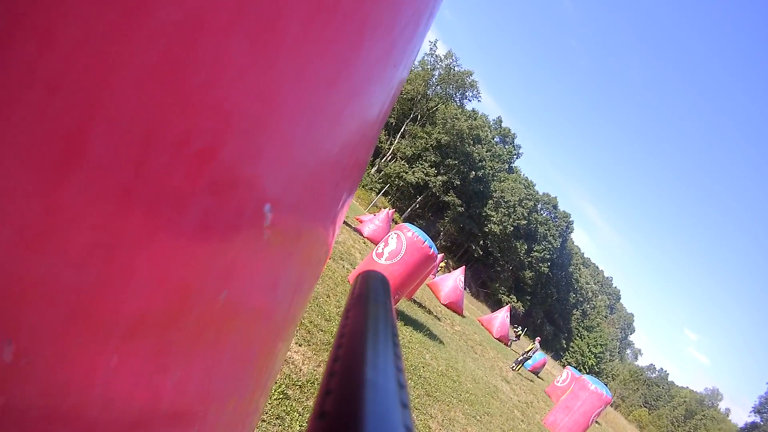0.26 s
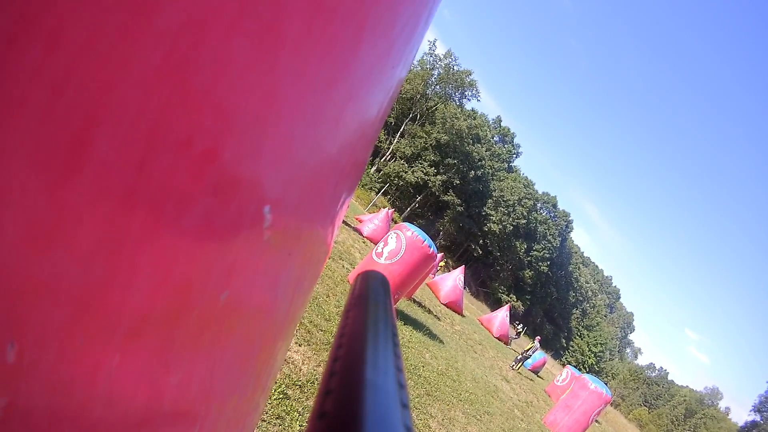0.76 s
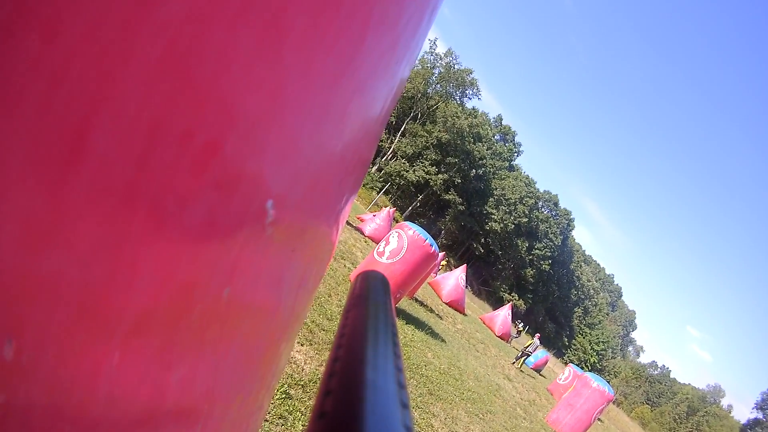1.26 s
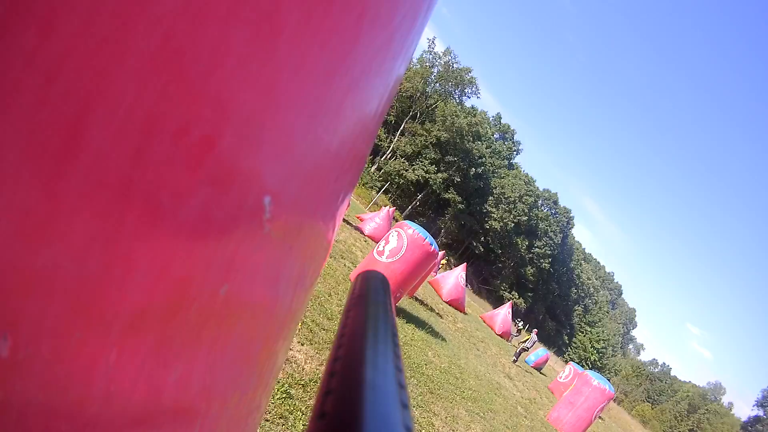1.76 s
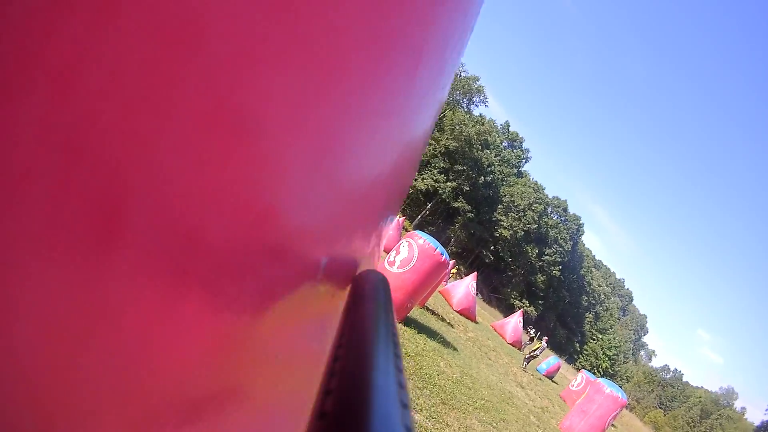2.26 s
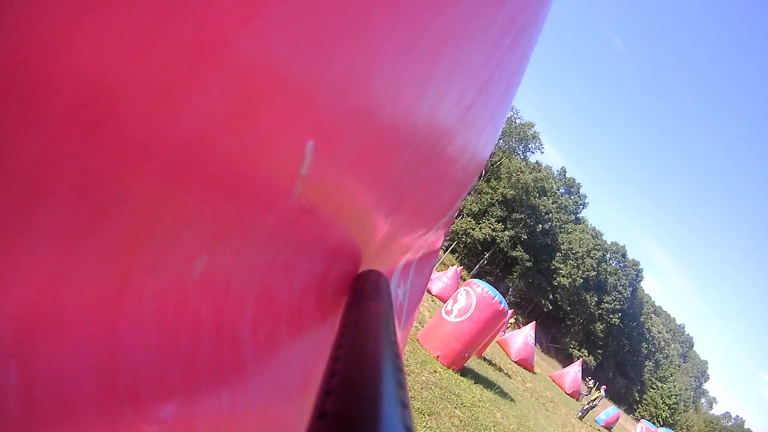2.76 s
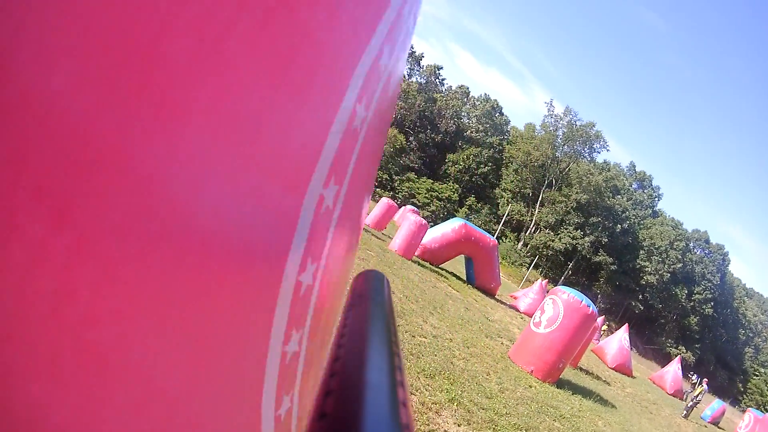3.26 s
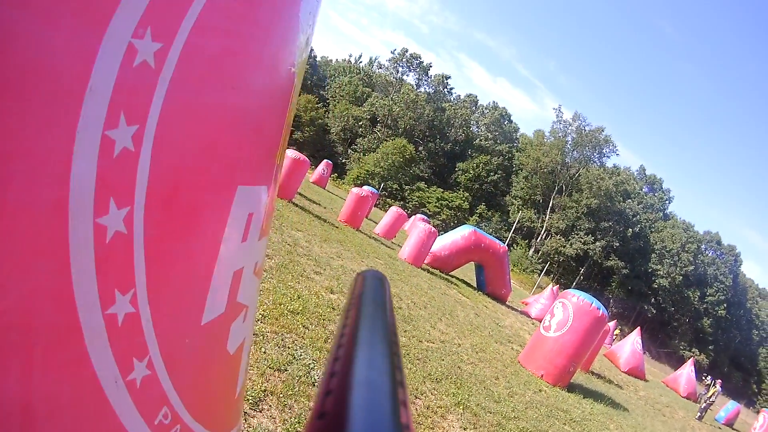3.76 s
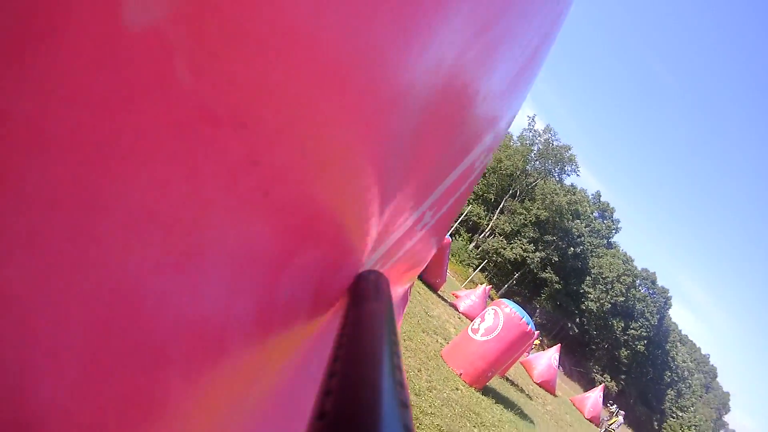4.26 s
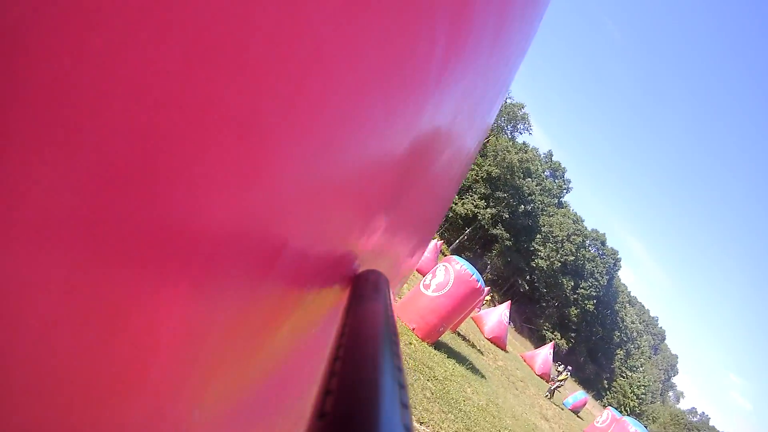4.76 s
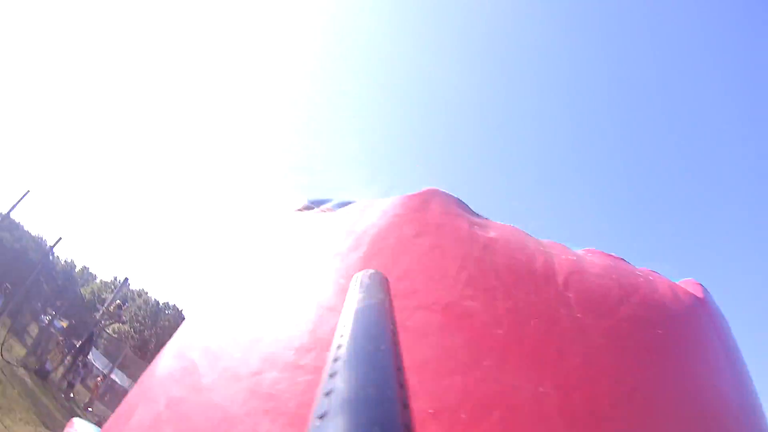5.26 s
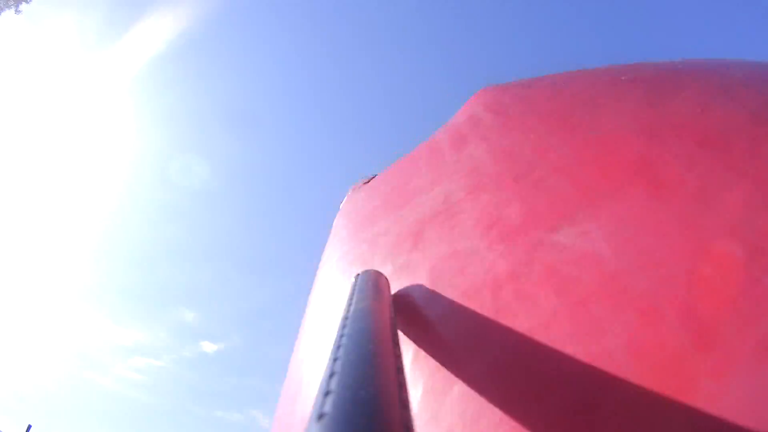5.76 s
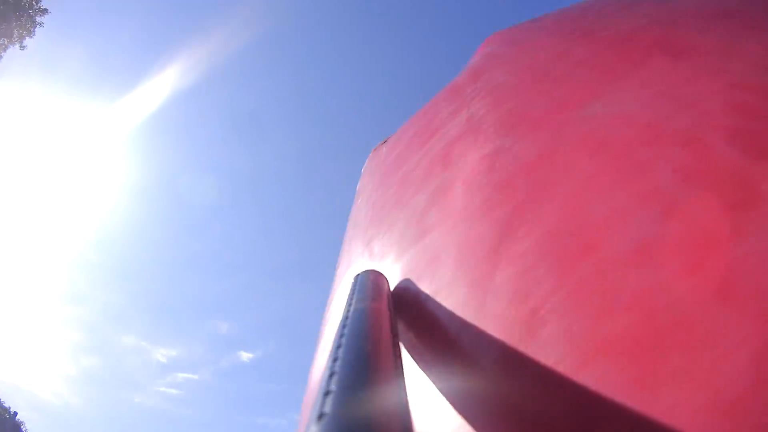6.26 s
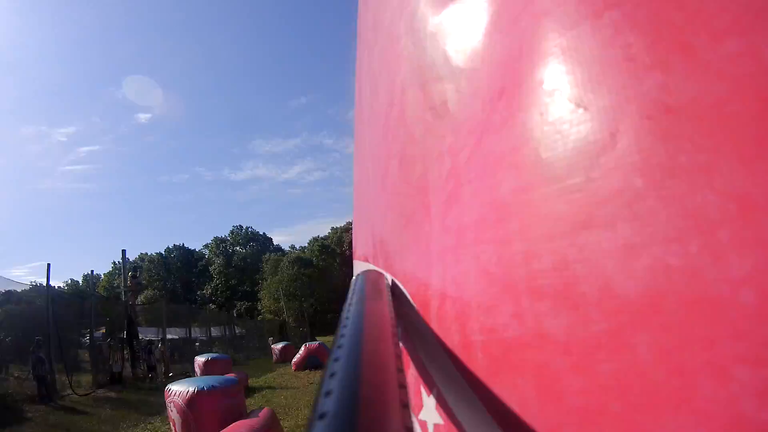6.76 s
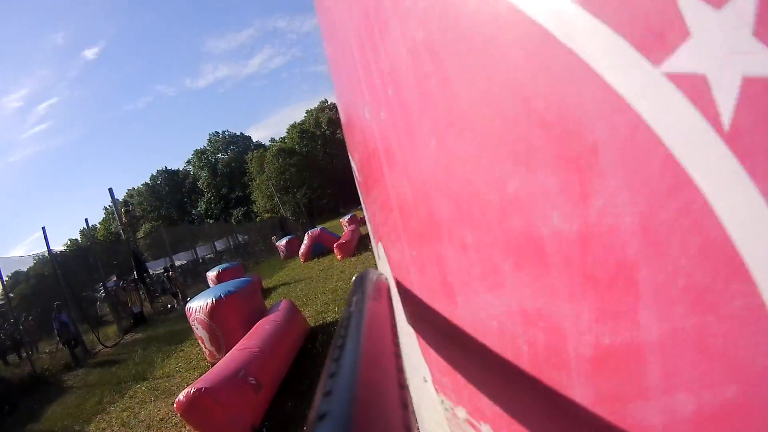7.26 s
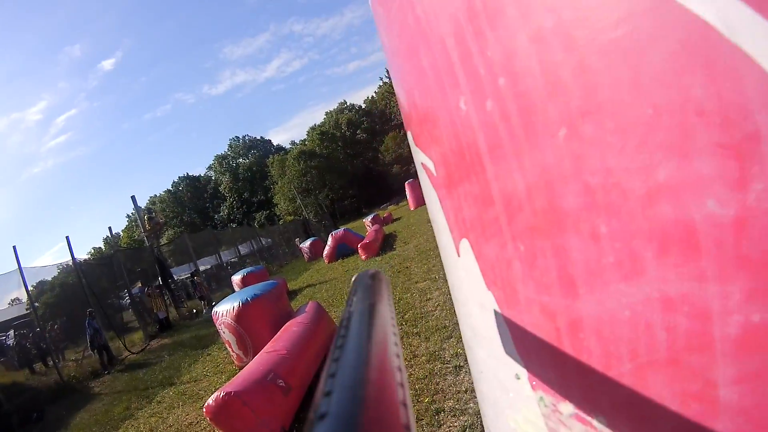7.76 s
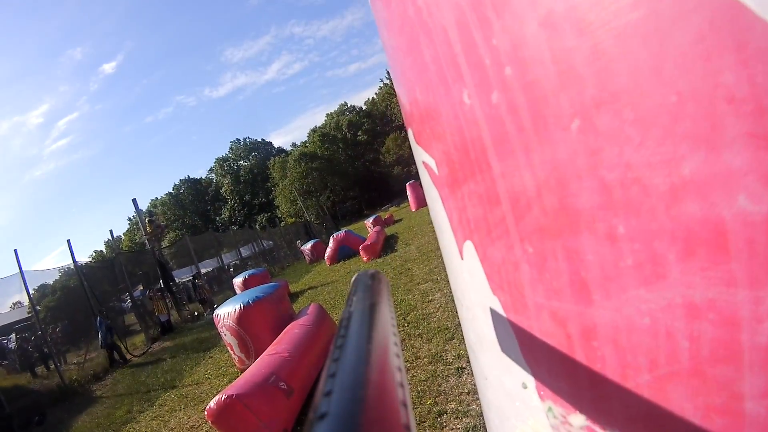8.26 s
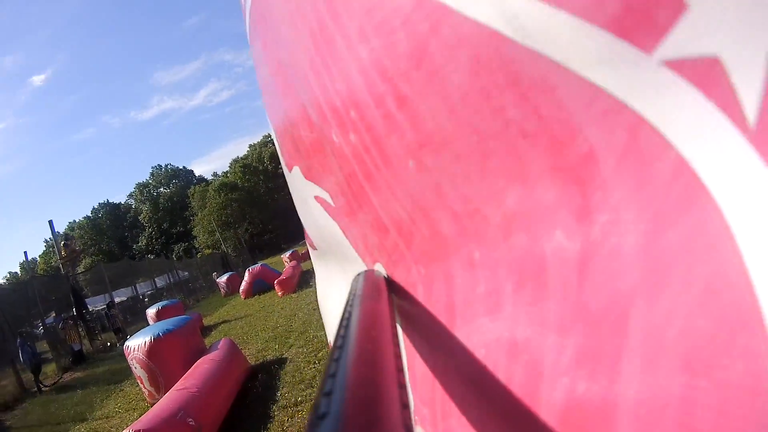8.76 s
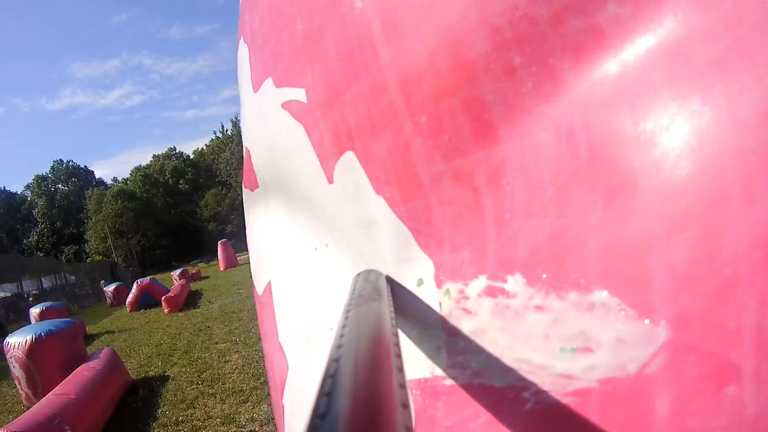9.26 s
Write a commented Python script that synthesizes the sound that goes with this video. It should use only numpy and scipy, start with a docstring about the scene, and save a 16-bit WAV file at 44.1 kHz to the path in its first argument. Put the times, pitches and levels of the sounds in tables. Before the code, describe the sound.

Heard from a small microphone clamped to a paintball marker on an outdoor field: five shots in an uneven burst, a near-silent gap, two quick shots, then a rapid run of six. Each is a sharp clack with a puff of gas and a slamming, overloaded second hit. Between them the barrel rubs an inflated vinyl bunker, balls rattle in the hopper and small knocks tick.

```python
"""A paintball marker fires thirteen shots; a small camera clamped to it hears mostly through the metal.
Each shot: the valve stirs, the bolt runs forward with a puff of gas, and 41 ms later slams back into overload.
Five shots come in the first 1.4 s, two after 3.6 s and six from 7.7 s. Between them balls rattle in the hopper
and the barrel rubs along an inflated bunker. Noise bursts and random taps excite decaying modes of the body."""
import sys
import numpy as np
from scipy import signal
from scipy.fft import rfft, irfft
from scipy.io import wavfile
from scipy.ndimage import uniform_filter1d

SR = 44100
rng = np.random.default_rng(int(sys.argv[2]) if len(sys.argv) > 2 else 0)


def master_out(mix):
    """Clip the mix to full scale and print it as 16-bit PCM to the path in sys.argv[1]."""
    frames = np.transpose(np.atleast_2d(mix))
    ceiling = np.clip(frames, -1, 1)
    pcm = np.round(ceiling * 32767).astype(np.int16)
    wavfile.write(sys.argv[1], SR, pcm)


def invert_db(level):
    """Linear amplitude ratio for a level in decibels (20 dB per decade), elementwise."""
    return 10 ** (np.asarray(level, dtype=float) / 20)


N = 419391
T = np.arange(N) / SR

# shots: bolt_start_s, valve_db (relative), slam_delay_ms, slam_db (relative), slam_loud_ms
SHOTS = [(.3180, -6.5, 40.4, 11.5, 4.6), (0.4158, -9, 42.0, 2.5, 2.6), (1.0910, -8.5, 40.4, 7, 2.4),
         (1.1979, -14.5, 41.8, 10, 3.6), (1.3233, -15.5, 41.5, 2.5, 2.6), (3.635, -9, 40.3, 10.5, 2.7),
         (3.7363, -14, 42.1, 7.5, 2.4), (7.7582, -17.5, 40.0, 10.5, 2.8), (7.935, -14, 41.0, 9.5, 2.6),
         (8.0299, -19.5, 41.8, 3, 2.6), (8.1246, -15.5, 42.2, 0.5, 2.6), (8.2259, -12, 41.7, 3.5, 2.6),
         (8.3666, -12.5, 41.9, 3.5, 2.6)]


def ring(column, lo_hz=0, hi_hz=SR):
    """Modal synthesis: an impulse response is a sum of decaying sines; neighbours swing in opposite senses."""
    # modes of marker and hopper: pitch_hz, t60_s, then relative gain when struck by
    # bolt_forward_db, slam_db, rubbing_db, balls_db (columns 2 to 5)
    modes = [(138, 0.02, -41, -43.5, -29, -25), (310.6, 0.14, -26, -40, -45, -13.5),
             (453.7, 0.0085, -22, -18, -55, -4.5), (894, .014, -14.5, -12.5, -50, -2),
             (1034, 1.3, -76, -46, -89.5, -70.5), (1188.5, 0.024, -8, 2, -12, -4),
             (1447, 0.0099, -2.5, -17, 0, 3.5), (1580, 0.021, -9.5, -15.5, -1, -4.5),
             (1710, 0.012, -5.5, -0.5, -8.5, -7), (2015, 0.011, -2.5, -18, -4, -8),
             (2504, 0.0079, -8.5, -17.5, -11, -12), (2972, 0.014, -5, -13, -13.5, -18),
             (3270, 0.0084, -4, -19, -12.5, -18), (4120, 0.008, -5, -17.5, -12, -21),
             (5100, 0.0063, -14, -34, -18.5, -27), (5860, 0.0075, -9.5, -30, -15, -27.5),
             (7320, 0.006, -3, -30, -22, -33), (7550, .3, -63, -63, -67, -70.5),
             (7930, 0.014, -17, -30.5, -21.5, -44), (8850, .008, -10, -35.5, -24.5, -43.5),
             (10820, 0.0093, -16.5, -41.5, -21, -48.5), (10870, .55, -63, -62, -56, -80),
             (11110, .5, -68, -68, -80, -85), (8000, 0.092, -37, -47, -70, -75.5),
             (668, 0.004, -16.5, -7.5, -59, -8), (9150, .08, -50.5, -61, -33.5, -76),
             (11770, 0.0096, -19.5, -40.5, -33, -55), (14300, 0.0065, -22, -47, -30, -56)]
    t = T[:2 * SR]
    response = 0
    for k, mode in enumerate(modes):
        pitch_hz, t60_s = mode[:2]
        if lo_hz <= pitch_hz < hi_hz:
            decay = np.exp(-np.log(1000) * t / t60_s)
            response = response + (-1) ** k * invert_db(mode[column]) * decay * np.sin(2 * np.pi * pitch_hz * t)
    return response


def strike(force, response):
    """Linear superposition: convolution lets every instant of the force start its own response."""
    return signal.fftconvolve(force, response)[:N]


def unit(x):
    """Normalisation to rms 1."""
    return x / np.sqrt(np.mean(x ** 2))


def add(out, s, burst):
    """Superposition of a burst at time s."""
    i = int(s * SR)
    out[i:i + len(burst)] += burst[:N - i]


def grains(rate, spread_db):
    """Random impacts: sparse independent taps, rate per second, of unequal size."""
    hits = rng.random(N) < rate / SR
    extra_db = spread_db * np.minimum(rng.exponential(size=N), 3)
    return hits * rng.standard_normal(N) * invert_db(extra_db)


def walk(rate):
    """Slow random modulation: levels held 1 / rate s and slewed; spread near 1."""
    hold = int(SR / rate)
    levels = np.repeat(rng.standard_normal(N // hold + 1), hold)
    return 1.2 * uniform_filter1d(levels, hold)[:N]


def bolt_forward():
    """Impact excitation: creeping gas with a valve knock 5 ms in, bright hit, duller one 4 ms on, hiss; a bounce."""
    valve_lead_s = 0.0086  # the valve knocks this long before the bolt starts
    force, t = np.zeros(N), T[:SR // 10]

    def fade(start_s, tau_s):
        """Exponential decay from a sudden onset."""
        return (t >= start_s) * np.exp(-np.maximum(t - start_s, 0) / tau_s)

    def soft(x, size):
        """Low-pass by two moving averages, as of a softer contact."""
        return uniform_filter1d(uniform_filter1d(x, size), size)

    noises = rng.standard_normal((len(SHOTS), 4, len(t)))
    bright = fade(0, 0.0015) + invert_db(-11) * fade(0, 0.0054) + invert_db(-26.5) * fade(0, 0.0097)
    dull = invert_db(-7.5) * fade(0, 0.0027) + invert_db(6.5) * fade(0.004, 0.00068)
    valve = invert_db(-16) * (t < 0.014) + fade(0.005, 0.0011)  # creeping gas, with the knock 5 ms in
    bounce = invert_db(-26) * fade(0, 0.003) + invert_db(-33) * fade(0.0094, 0.0014)  # just after the slam
    for (s, valve_db, slam_delay_ms, *_), (a, b, c, d) in zip(SHOTS, noises):
        add(force, s, bright * a + soft(dull * b, size=4))
        valve_noise = invert_db(7) * soft(valve * c, size=8) + invert_db(-7) * valve ** 2 * d
        add(force, s - 0.005 - valve_lead_s, invert_db(valve_db) * valve_noise)
        add(force, s + slam_delay_ms / 1000 + 0.00053, bounce * d)
    return invert_db(-22.5) * strike(force, ring(2))


def slam():
    """Impulse response of the rear stop: the same clang, cut down sharply after a few ms, ringing until the next."""
    tail_db = -8
    out, clang = np.zeros(N), ring(3)
    t = T[:len(clang)]
    for s, _, slam_delay_ms, db, loud_ms in SHOTS:
        hit_s, loud_s = s + slam_delay_ms / 1000, loud_ms / 1000
        loudness = np.interp(t, [loud_s, loud_s + 0.0004], [invert_db(db), invert_db(tail_db)])
        out[int(hit_s * SR):] = 0  # ends the previous clang
        add(out, hit_s, loudness * clang)
    return out


def rubbing():
    """Stick-slip friction of barrel on vinyl, on and off at once; pressing harder wakes the low modes."""
    # contacts with the bunker: on_s, off_s, on_db, off_db (relative force),
    # mid_db (extra gain of the low modes at mid-contact)
    contacts = [(0, 0.14, -90, -104, 14), (2.318, 2.709, -82.5, -79.5, 1), (2.78, 3.296, -83, -77.5, 1.5),
                (4.132, 4.195, -70.5, -77, 3), (4.198, 4.329, -63.5, -63.5, -1.5),
                (4.33, 4.803, -69, -77.5, -4.5), (4.809, 4.885, -65.5, -71, -5.5),
                (4.89, 5.212, -76, -66, 13.5), (5.229, 5.517, -86, -87, 5), (5.531, 5.706, -71.5, -85, -5),
                (5.711, 6.0, -87.5, -88, -1.5), (6.256, 6.461, -78, -88, -1),
                (6.463, 6.668, -84.5, -86.5, 1), (6.694, 7.0, -67, -78, 1.5), (7.003, 7.351, -69, -86, 2.5),
                (8.714, 8.878, -72, -83, -3), (8.884, 9.019, -82, -81, 1), (9.019, 9.1, -78, -67, 0),
                (9.101, 9.279, -72.5, -69, -3.5), (9.28, 9.354, -69.5, -85, -3)]
    flicker_db, flickers_per_s = 1.6, 25
    grip, press_db = np.zeros(N), np.zeros(N)
    for on_s, off_s, on_db, off_db, mid_db in contacts:
        touching = (T > on_s) & (T < off_s)
        along = np.clip((T - on_s) / (off_s - on_s), 0, 1)
        grip += touching * invert_db(on_db + (off_db - on_db) * along)
        press_db += mid_db * np.sin(np.pi * along)
    slip = unit(rng.standard_normal(N) + 0.79 * unit(grains(1200, 1.4)))
    low, high = ring(4, 0, 4600), ring(4, 4600, SR)
    force = grip * invert_db(flicker_db * walk(flickers_per_s)) * slip / np.linalg.norm(high)
    return strike(force, high) + strike(invert_db(press_db) * force, low)


def tumbling():
    """Gains of taps and hollow note by energy decay: slams jolt the balls, shakes swell and die."""
    # the marker is moved and the balls shift:
    # start_s, strongest_s, fade_s (rough times; fade_s may precede the peak, which cuts the swell short),
    # taps_db, hollow_note_db (relative)
    shakes = [(0.065, 0.12, 0.18, -61.5, -62), (0.267, .29, 0.29, -60, -72),
              (0.734, 0.795, 1, -65.5, -64.5), (1.986, 2.02, 2.093, -60.5, -58.5),
              (2.47, 2.49, 2.52, -81.5, -73), (2.6, 2.68, 2.67, -61, -60), (2.72, 2.751, 2.83, -65.5, -70),
              (3.0, 3.117, 3.64, -80.5, -76.5), (3.193, 3.22, 3.53, -63.5, -65),
              (3.461, 3.458, 3.4, -62, -63), (3.55, 3.61, 3.3, -72, -63), (4.128, 4.223, 4.4, -66.5, -66),
              (4.378, 4.487, 4.76, -62.5, -63.5), (4.811, 4.818, 4.6, -69.5, -75.5),
              (4.922, 4.955, 5.1, -61.5, -62.5), (5.18, 5.199, 5.1, -51.5, -52.5),
              (5.263, 5.355, 5.65, -46.5, -48), (5.566, 5.582, 5.71, -51, -57),
              (5.729, 5.807, 6.07, -55.5, -52), (5.866, 5.88, 5.23, -55, -55),
              (6.022, 6.048, 6.1, -70, -61), (6.098, 6.098, 6.25, -62, -58), (6.264, 6.326, 6.55, -60, -60),
              (6.401, 6.45, 6.7, -68.5, -66), (6.844, 6.984, 7.23, -48.5, -51),
              (7.072, 7.127, 7.4, -40.5, -50), (7.433, 7.5, 7.84, -61, -63),
              (8.701, 8.741, 8.8, -61.5, -57.5), (8.869, 8.889, 8.9, -64, -72.5),
              (9.02, 9.036, 9.47, -64.5, -64), (9.195, 9.256, 8.75, -53, -71.5)]
    rise_db, fall_db = 13, 15.5
    # after each slam the balls jump, sink away steadily, and come to rest
    jolt_db, jolt_note_db, sink_db_per_s, note_sink_db_per_s = -45, -51, 61.5, 54.5
    rest_s, rest_db_per_s = 0.3, 240
    flicker_db, flickers_per_s = 2, 30
    taps, note = np.zeros(N), np.zeros(N)
    for s, _, slam_delay_ms, *_ in SHOTS:
        t = T - s - slam_delay_ms / 1000
        rest_db = -rest_db_per_s * np.maximum(t - rest_s, 0)
        taps = np.maximum(taps, (t > 0) * invert_db(jolt_db - sink_db_per_s * np.abs(t) + rest_db))
        note = np.maximum(note, (t > 0) * invert_db(jolt_note_db - note_sink_db_per_s * np.abs(t) + rest_db))
    for start_s, strongest_s, fade_s, taps_db, note_db in shakes:
        swell_db = np.interp(T, [start_s, strongest_s, fade_s], [-rise_db, 0, -fall_db])
        outside_s = np.maximum(start_s - T, 0) + np.maximum(T - fade_s, 0)
        swell = invert_db(swell_db - rest_db_per_s * outside_s)
        taps = taps + invert_db(taps_db) * swell
        note = note + invert_db(note_db) * swell
    # each gain is smoothed and flickers on its own
    return [uniform_filter1d(gain, size=400) * invert_db(flicker_db * walk(flickers_per_s)) for gain in (taps, note)]


def balls():
    """Random impacts on resonators: dense soft taps of gelatine balls in the hopper, and the hollow's own note."""
    tap_gain, note_gain = tumbling()
    taps = uniform_filter1d(unit(grains(700, 4.3)) + 0.45 * rng.standard_normal(N), size=6)
    hollow = ring(5, 200, 400)
    note = unit(strike(unit(grains(500, 1.9)), hollow))
    shell = strike(taps, ring(5) - hollow)
    return tap_gain * unit(shell) + note_gain * note


def knocks():
    """Impact excitation by lone taps: a dull part in the low modes, a bright tick in the high ones."""
    # single knocks on the body: start_s, dull_db, treble_db (relative force)
    lone_taps = [(0.1089, -37, -83), (0.129, -46, -86), (0.156, -37.5, -88), (0.2063, -37.5, -89),
                 (0.251, -43, -83), (0.3003, -17.5, -45), (0.3795, -16, -34), (0.386, -24, -39),
                 (0.4405, -13, -50), (0.449, -21, -48), (0.5087, -23, -83), (0.5562, -29.5, -49),
                 (0.584, -30.5, -77), (0.703, -28.5, -87.5), (0.8788, -38, -63), (1.0715, -21.5, -33),
                 (1.1485, -13, -42.5), (1.1645, -37, -41), (1.1715, -25, -47), (1.2855, -24, -73),
                 (1.3035, -14.5, -42.5), (1.5539, -28.5, -49.5), (1.604, -49, -87), (1.6173, -32.5, -84),
                 (2.0194, -48.5, -85), (2.1944, -59.5, -71), (2.2945, -60, -72), (2.3192, -56, -73.5),
                 (3.1395, -45, -66), (3.383, -36.5, -89), (3.459, -34, -72.5), (3.5548, -50, -81.5),
                 (3.618, -25.5, -38.5), (3.702, -27, -33.5), (3.79, -16.5, -43), (3.796, -36, -45.5),
                 (3.8232, -22.5, -68), (3.88, -43, -68.5), (3.8982, -41, -76), (4.137, -47.5, -67),
                 (4.2028, -49, -61), (4.4044, -57.5, -64), (4.8177, -45, -51), (5.323, -40.5, -73),
                 (5.5856, -37, -66.5), (5.6488, -37.5, -69.5), (5.9273, -35, -77.5), (5.9486, -33, -83),
                 (6.0985, -32, -77), (5.868, -47.5, -81), (5.884, -38, -78), (5.915, -37, -76),
                 (6.05, -48, -85), (6.202, -46.5, -81), (6.27, -39, -87), (6.322, -40, -84),
                 (6.59, -37, -84.5), (6.131, -41, -87), (6.6954, -47.5, -63.5), (6.7162, -41.5, -56.5),
                 (7.0154, -48, -56), (7.1187, -17.5, -55.5), (7.1516, -19.5, -71), (7.493, -34.5, -85),
                 (7.6082, -49.5, -82), (7.6801, -35.5, -86), (7.8542, -20, -69), (7.9215, -22.5, -60),
                 (8.0125, -18, -59), (8.1055, -19, -70), (8.3105, -20.5, -52), (8.3495, -24, -44.5),
                 (8.404, -6.5, -32.5), (8.4492, -27.5, -65.5), (8.4821, -32, -67), (8.5762, -33, -81.5),
                 (8.6368, -38, -78), (8.7151, -34, -63)]
    low, high, t = np.zeros(N), np.zeros(N), T[:200]
    bursts = rng.standard_normal((len(lone_taps), len(t))) * np.exp(-t / 0.00064)
    for (s, db, treble_db), burst in zip(lone_taps, bursts):
        add(low, s, invert_db(db) * burst)
        add(high, s, invert_db(treble_db) * burst)
    return invert_db(-20) * strike(low, ring(5, 0, 4000)) + strike(high, ring(2, 2700, SR))


def floor():
    """Stationary noise shaped in the frequency domain: faint hiss of field and electronics."""
    # noise spectrum: frequency_hz, density_db (relative, per Hz)
    spectrum = [(18, -35), (30, -3), (49, -15.5), (199, -12), (303, -4.5), (649, -16.5), (1430, -5.5),
                (2170, -10.5), (16000, -46)]
    hz, db = np.transpose(spectrum)
    f = np.fft.rfftfreq(N, 1 / SR) + 1  # the 1 Hz offset avoids log(0)
    shape = invert_db(np.interp(np.log(f), np.log(hz), db))
    return invert_db(-82) * unit(irfft(rfft(rng.standard_normal(N)) * shape, N))


def scene():
    """Linear superposition of all the sources at one microphone."""
    return (bolt_forward() + slam() + rubbing() + balls() + knocks() + floor())[None]


def roll_off(x):
    """The treble ends steeply here."""
    return signal.sosfilt(signal.butter(12, 16310, fs=SR, output="sos"), x)


def record(dry):
    """High-pass and saturation: the microphone drops the deepest bass, then the input clips hard at full scale."""
    thin = signal.sosfilt(signal.butter(2, 90, "high", fs=SR, output="sos"), dry)
    clipped = np.clip(thin, -1, 1)
    return roll_off(clipped)


dry = scene()
out = record(dry)
master_out(out)
```